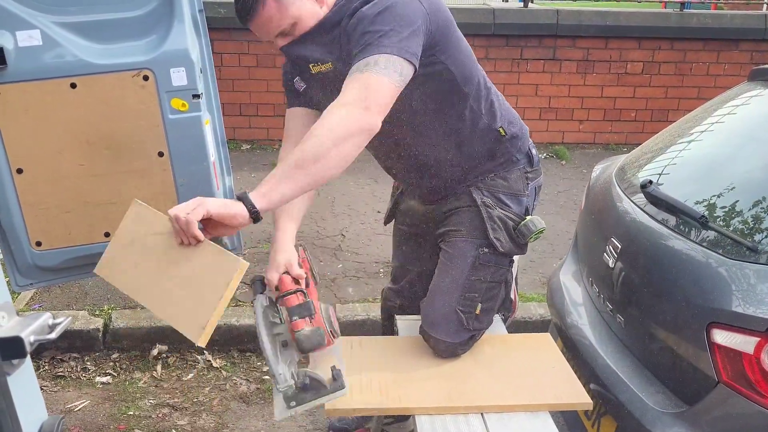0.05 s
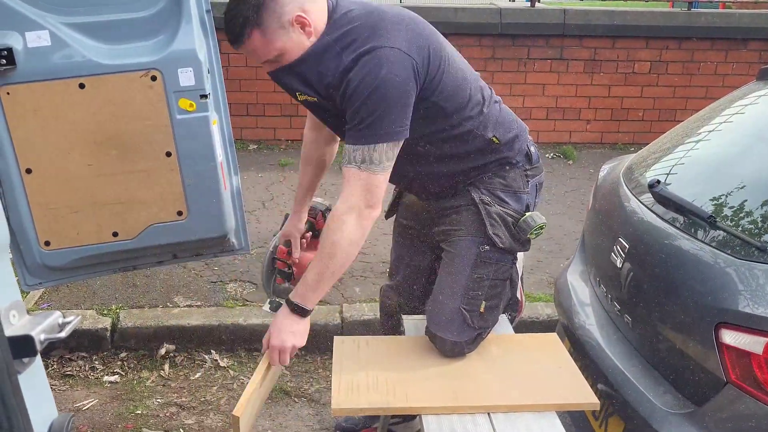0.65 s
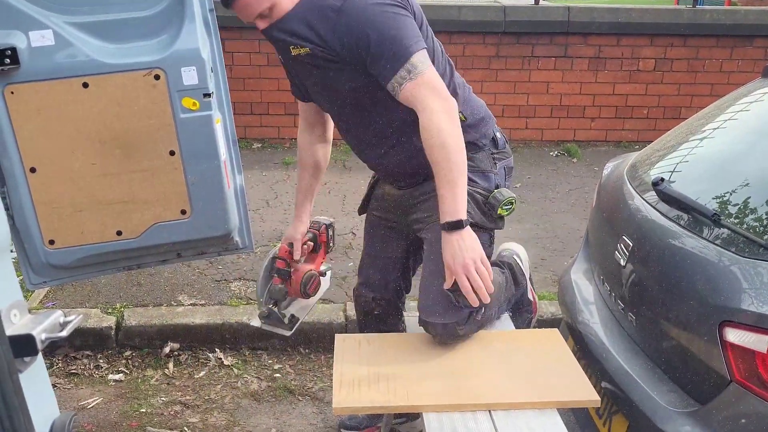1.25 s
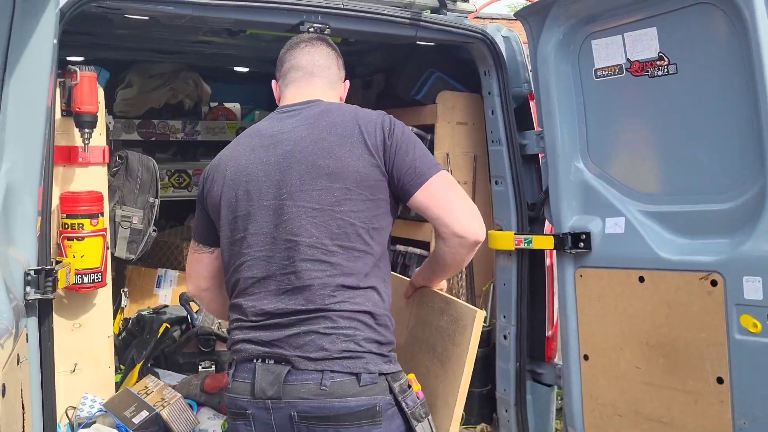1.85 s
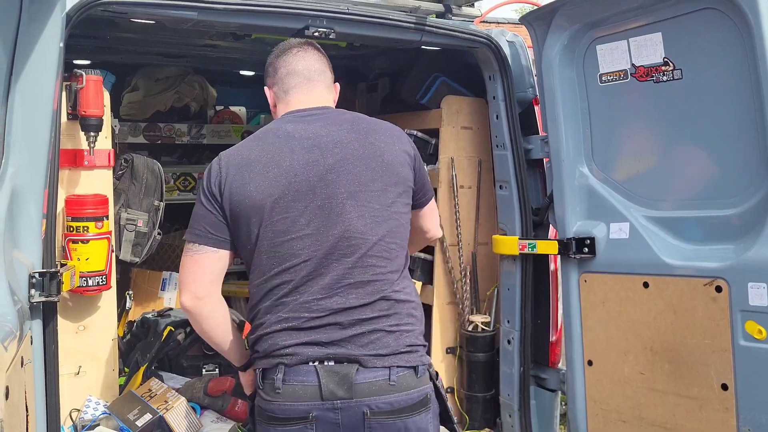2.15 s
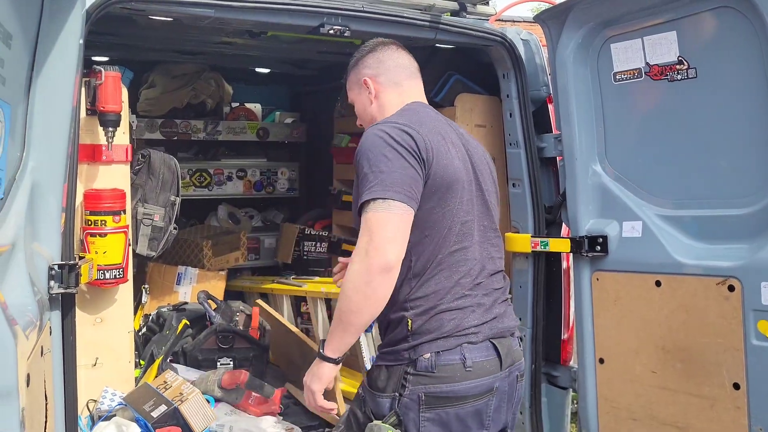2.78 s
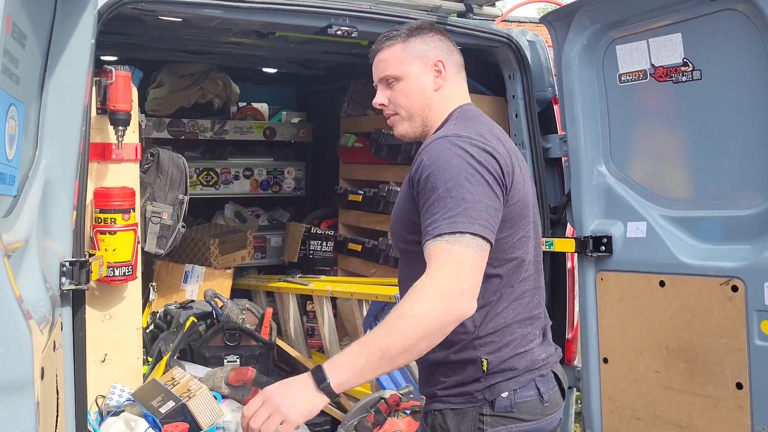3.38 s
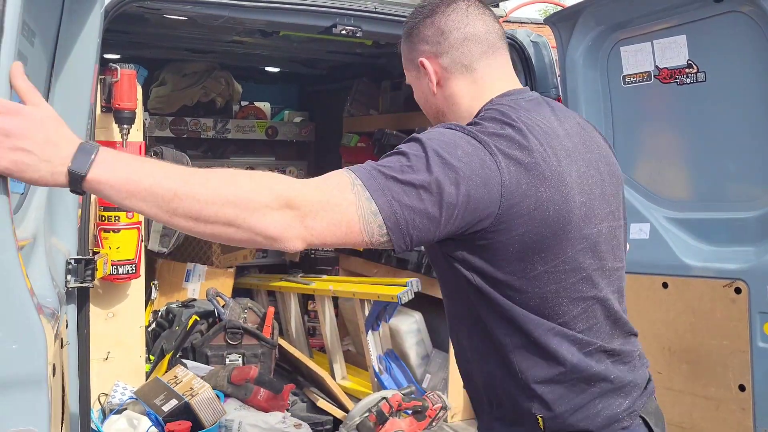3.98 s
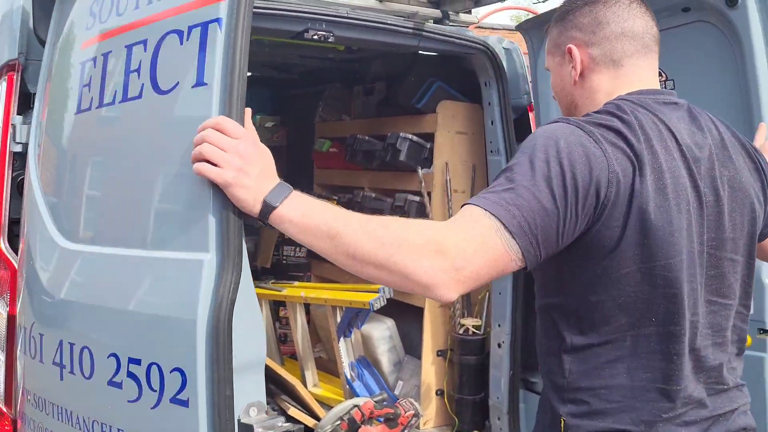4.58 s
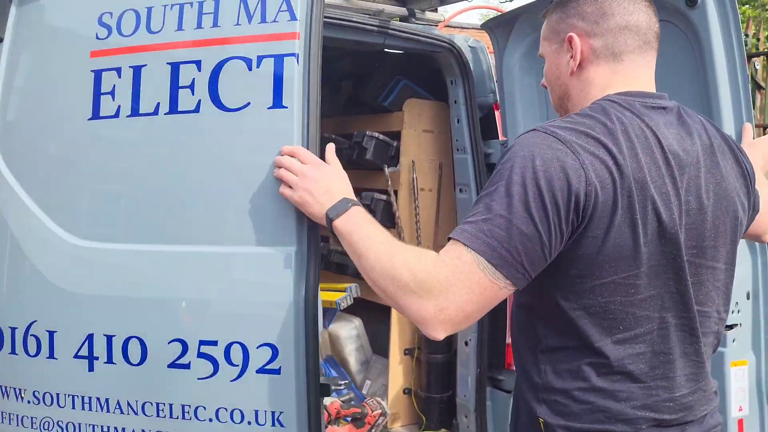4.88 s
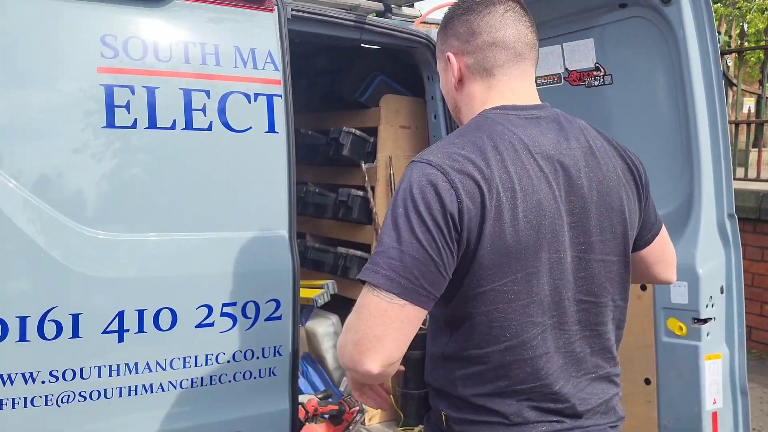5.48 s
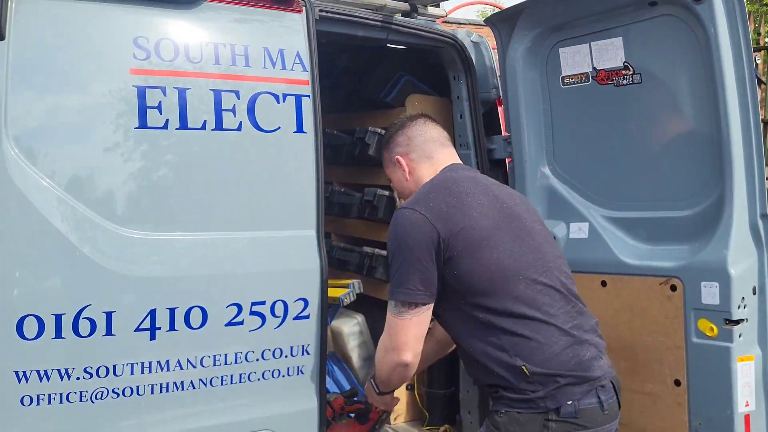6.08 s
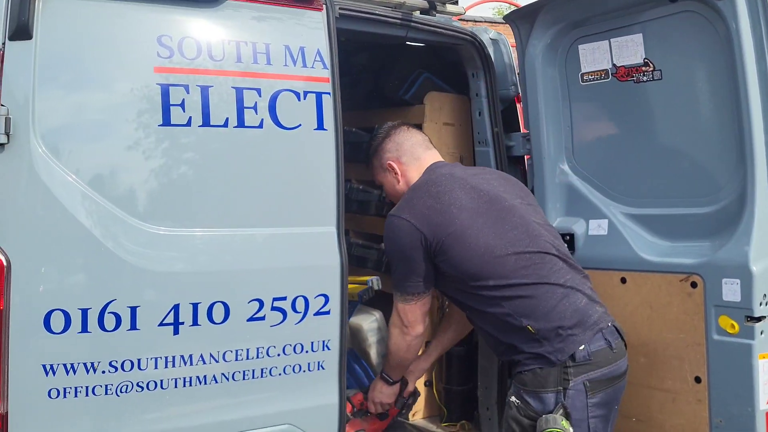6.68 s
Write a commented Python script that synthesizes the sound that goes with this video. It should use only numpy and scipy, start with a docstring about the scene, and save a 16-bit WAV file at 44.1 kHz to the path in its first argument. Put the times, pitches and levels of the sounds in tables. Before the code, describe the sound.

A quiet street, with faint distant traffic and a light breeze on the microphone. At the very start a saw's base clacks lightly, followed by soft clothing rustle and a barely audible thin whine. At about 1.1 seconds a wooden offcut hits the kerb with a sharp, loud clatter, toppling flat at 1.3. At 1.8 boards and tools clatter loudly into a van, with lighter knocks around 2.1. A second clatter runs from 2.6 to 2.8, with wood clacking against shelving and a tiny squeak, then the floor rumbles briefly. A soft knock comes at 4 seconds, and a door stay clacks twice at 4.4. Light knocks and hinge ticks lead to the rear door slamming at 5.4, a heavy shudder with a deep thump of air. Gear shifts faintly near 6.6. A far-off bird chirps faintly around 1.5, 2.3, 4.2 and 6 seconds.

```python
"""In a quiet street, with a breeze on the microphone and traffic far off, a tradesman lifts a saw; his clothes
rustle. He drops a board offcut, which bounces on the kerb and topples flat; a small bird calls far off. He
stows boards and saw among the gear in his van: things knock, heavy ones land on a corner and clatter, and the
floor rumbles. Last he frees a rear door from its stay, swings it round and slams it, pushing air out of the
load bay. Each impact excites the normal modes of the struck body, which then decay freely."""
import sys
import numpy as np
from scipy import signal
from scipy.io import wavfile
from scipy.ndimage import uniform_filter1d, minimum_filter1d

SR = 44100
rng = np.random.default_rng(int(sys.argv[2]) if len(sys.argv) > 2 else 0)


def write(x):
    x = np.atleast_2d(x).T
    wavfile.write(sys.argv[1], SR, np.round(np.clip(x, -1, 1) * 32767).astype(np.int16))


N = 297586
TIME = np.arange(N) / SR
EDGES = 22 * 2 ** (np.arange(20) / 2)   # half-octave bands [Hz]
CENTRES = np.sqrt(EDGES[1:] * EDGES[:-1])

# Single impacts: (time [s], level [dB], extra bass [dB], extra treble [dB], decay time factor [1])
SAW_HITS = [(.043, -24, -24, -5, .65), (.064, -35, -30, 4, .9), (.136, -29.5, -30, -31, 1.2),
            (1.37, -29, 4, -7, 1.1)]
BOARD_HITS = [(1.038, -19, 22, -5.5, .7), (1.052, -14.5, 11.5, -14.5, .4), (1.0671, -9, -3.5, -1.5, .6),
              (1.084, -6.5, -2, 4.5, .9), (1.095, -16, -2.5, 7.5, 1.1), (1.176, -27, -5.5, -3, .7),
              (1.245, -43, -2, 14, .8)]
GEAR_HITS = [(1.694, -35, -30, 10, .6), (2.033, -42, 12, 17, .9), (2.117, -23, -4, -10, .8),
             (2.195, -30, 5.5, -18, 1.2), (2.56, -17, -16, 3.5, 2.2), (2.762, -19, 4, 1, 1),
             (3.098, -40, 6, 4, 1.2), (6.092, -53, 8, 14, .6)]
DOOR_HITS = [(4.025, -32.5, 2, 1, .8), (4.318, -46, -2, -4, 1), (4.592, -35, -9, 4, .6),
             (5.085, -28.5, -10, 10, .65), (5.348, -13, 0, -4, .9)]   # hand, stay and seal
# Impacts of the stowed board on the shelving: (time [s], level [dB])
SHELF_HITS = [(1.786, -19), (1.819, -12), (2.117, -35), (2.588, -14.5), (2.61, -12), (2.65, -17),
              (2.789, -16.5)]
# Runs of impacts: (time [s], level [dB], interval [s], loss by the last impact [dB],
# extra bass [dB], extra treble [dB], decay time factor [1])
OFFCUT_TOPPLE = (1.304, -15.5, .006, 0, .5, 0, .8)
GEAR_CLATTERS = [(1.782, -5, .036, 38, 0, 1.5, .7), (2.587, -12, .025, 8, 2, 3, .9),
                 (2.786, -18.5, .056, 23, 3, 2.5, 1.3), (2.993, -45.5, .03, 0, 0, 11, 1.8),
                 (6.589, -42.5, .042, 50, 8, 2, .9)]
STAY_RELEASE = (4.377, -12.5, .026, 6, -14, 5, .53)
HINGE_TICKS = (5.157, -32.5, .042, 2, -10, 6.5, .65)
SLAM = (5.361, -7.3, .021, 29, 1.5, 2.5, .85)
# Distinct normal modes: (frequency [Hz], relative level [dB], base T60 [s])
SAW_MODES = [(445.4, -15.5, 0.14), (889, -8, 0.09), (1064, -30, 0.16), (1094, -7, .09), (1517, -6, 0.071),
             (1773, -14.5, 0.11), (2240, -10.5, .075), (2343, -12.5, 0.0993), (2930, -21, .08),
             (4830, -33, 0.083)]
BOARD_MODES = [(328, -20.5, 0.6), (455, -28, .25), (684, -20, .2), (832, -10.5, .12), (984, -13.5, .15),
               (1112, -11, .17), (1232, -12, .17), (1375, -14, .14), (1580, -15, .13), (1885, -14, .1),
               (2216, -13, .09), (2865, -21, .12), (3980, -31, .1)]
GEAR_MODES = [(136, -6.5, .2), (164.5, -15, 0.25), (403.4, -4.5, 0.15), (435, -21, .16), (719, -21, 0.12),
              (809, -4, 0.085), (884.5, -6.5, 0.081), (1001, -11.5, 0.13), (1113, -12, 0.12),
              (1376, -25, 0.076), (1709, -26, 0.12), (1967, -12, 0.051), (2330, -30.5, 0.22),
              (3830, -25, .08)]
SHELF_MODES = [(520, -14.5, 0.042), (679, -10, 0.11), (768, -5, 0.11), (826, 0.5, 0.07), (900, -9.5, 0.15),
               (1015, -12, 0.052), (1130, -18, 0.13)]
DOOR_MODES = [(36, -12.5, 0.12), (56, -13, 0.73), (82, -3.5, 0.28), (115.7, -27.5, 1), (171.9, -6.5, 0.31),
              (251, -4.5, .25), (320.7, -8, 0.32), (366.7, -4.5, 0.25), (433, -12, 0.11), (704.5, -20, .25),
              (847, -27, 0.28), (1016, -22, 0.28), (1140, -31, 0.26), (1875, -20, .12), (2290, -23, .18),
              (2680, -34, 0.22), (3700, -34.5, 0.074), (3660, -39, 0.15), (5030, -37, 0.33)]
# Dense, overlapping modes: (frequency [Hz], relative spectral density [dB], base T60 [s])
SAW_DENSE = [(38.8, -27, .08), (200, -13.5, 0.16), (450, -3, 0.05), (900, -3, 0.11), (1600, -1.5, 0.074),
             (2367, -10.5, 0.092), (3414, -19.5, .08), (7350, -26, 0.027), (9500, -49, 0.11),
             (15000, -52, .08)]
BOARD_DENSE = [(40, -26.5, .1), (150, -10, .1), (400, -5, 0.32), (900, 2.5, .11), (1500, -4.5, .1),
               (2540, -4.5, .09), (4000, -18.5, .1), (7500, -28, .1), (9500, -40.5, .1), (15000, -47, .1)]
GEAR_DENSE = [(29.68, -16, .25), (70, -8, 0.63), (140, -2.5, 0.31), (400, 4.5, 0.15), (830, -7.5, 0.095),
              (1390, -11, 0.22), (2420, -14, 0.11), (4060, -22.5, 0.2), (7720, -31, 0.17),
              (9490, -42, 0.19), (15300, -41, 0.13)]
DOOR_DENSE = [(30, -10.5, 0.1), (70, -8, 0.36), (170, 0.5, 0.29), (370, -5, 0.39), (550, -17, 0.27),
              (880, -10.5, 0.22), (1500, -19.5, .2), (2500, -24.5, 0.3), (4000, -29.5, .19),
              (7500, -35, 0.16), (9600, -45.5, .18), (15000, -43, .16)]
# Noise spectra: (frequency [Hz], relative spectral density [dB])
RUMBLE_SPECTRUM = [(25, -11), (55, 6.5), (110, -1.5), (250, -12), (500, -20.5), (1200, -36), (4000, -56)]
TRAFFIC_SPECTRUM = [(30, 7.5), (300, 9), (700, 1.5), (1500, -2), (3000, -6), (7200, -6.5), (9000, -20.5),
                    (15000, -20.5)]
RUB_SPECTRUM = [(100, -5), (1000, 3), (3000, 0.5), (7000, -1), (9500, -22.5), (15000, -10.5)]
PUSH_SPECTRUM = [(25, -4.5), (40, -0.5), (65, 0), (100, -14.5), (250, -31.5), (1000, -59.5), (4000, -84)]
# Swells of noise: (time [s], level [dB], Gaussian half-width [s])
RUMBLES = [(.55, -54, .07), (1.7, -54, .5), (2.9, -36, .1), (3.92, -51, .12), (4.6, -41.5, .1),
           (5.18, -33, .06), (5.79, -41, .07), (6.73, -35, .015)]   # breeze on the microphone, and the van floor after the clatter
RUBS = [(.48, -68, .07), (.752, -58, .022), (1.85, -53, .22), (2.374, -60, .04), (3.07, -58, .07),
        (4.75, -59.5, .45), (6.6, -62, .25)]
AIR_PUSH = (5.41, -15, .033)
# Swelling tones: (time [s], frequency [Hz], level [dB], Gaussian half-width [s])
WHINES = [(.35, 1113, -74, .34), (.55, 2620, -75, .35)]
HIGH_TONES = [(1.53, 5600, -61, 0.014), (2.28, 4500, -63, .01), (4.207, 4690, -58, 0.0095),
              (4.762, 4150, -66, 0.013), (6.04, 4650, -66, 0.013)]   # a distant bird's chirps and, at 4.762 s, one faint squeak
SQUEAKS = [(1.612, 389, -39, 0.015), (1.765, 405, -36, 0.0095), (2.578, 432.6, -22.5, 0.00847),
           (3.112, 409, -36, 0.007)]
# Reverberation before its onset ramp: (frequency [Hz], level re direct sound [dB], T60 [s])
STREET = [(60, -29, .5), (400, -4.5, 0.21), (1500, -23, .45), (4000, -7, .45), (14000, -21, .35)]
LOAD_BAY = [(50, -14, 0.3), (169, -11, 0.54), (500, -14.5, 0.54), (1501, -20.5, .45), (5000, -19.5, 1),
            (14000, -12, .4)]
# Coherence of the two channels: (frequency [Hz], correlation [1], left minus right [dB])
COHERENCE = [(60, 0.95, 1.0), (300, 0.96, 0.96), (1000, 0.36, 1.6), (2300, 0.15, 0.5), (5070, 0.015, -1),
             (14000, 0.032, -2)]

GEAR_SETTLING, DOOR_SETTLING = 1.4, 1.5   # a run's loss grows as this power of its progress
DULLING_DB = .6   # treble lost with each further impact of a run
GAP_SPREAD, TOUCH_SPREAD_DB, MODE_SPREAD_DB = .04, 1.0, 2.5   # random scatter from impact to impact
CUTOFF_HZ = 16000


def from_db(db):
    """Amplitude ratio of a level."""
    return 10 ** (np.asarray(db) / 20)


def at_hz(table, hz, column=1):
    """Interpolation of one column along log frequency."""
    table = np.array(table)
    return np.interp(np.log(hz), np.log(table[:, 0]), table[:, column])


def fade(t, t60):
    """Free exponential decay, 60 dB down after t60."""
    return np.exp(np.maximum(t * (-float(np.log(1000)) / t60), -20))


def swing_up(hz, t):
    """Onset transient: a vibration builds up in about half a cycle."""
    return 1 - np.exp(-np.minimum(4 * hz * t, 4) ** 2)


def swell(s, db, half_width):
    """Gaussian envelope centred on time s."""
    return from_db(db) * np.exp(-.5 * np.minimum(((TIME - s) / half_width) ** 2, 100))


def wander(size):
    """Random fluctuation of unit variance, correlated over size samples."""
    slow = uniform_filter1d(rng.standard_normal(N), size=size)
    return slow / slow.std()


def band_gains(spectrum):
    """Band power is density times bandwidth; the rms gains are scaled to unit total power."""
    gains = from_db(at_hz(spectrum, CENTRES)) * np.sqrt(CENTRES)
    return gains / np.linalg.norm(gains)


def noise_bands():
    """Partially coherent noise (band, channel, time): alike in the bass, unrelated in the treble."""
    white, bands = rng.standard_normal((2, 2, N)), []
    for k, hz in enumerate(CENTRES):
        bandpass = signal.butter(3, EDGES[k:k + 2], "band", fs=SR, output="sos")
        pair = signal.sosfilt(bandpass, white[k % 2])
        mid, side = pair / pair.std()
        correlation = at_hz(COHERENCE, hz)
        common = np.sqrt((1 + correlation) / 2) * mid
        opposed = np.sqrt((1 - correlation) / 2) * side * [[1], [-1]]
        balance = from_db(at_hz(COHERENCE, hz, column=2) * np.array([[.5], [-.5]]))
        bands.append(balance * (common + opposed))
    return np.array(bands, dtype=np.float32)


def coloured(bands, spectrum):
    """Stationary noise as a weighted sum of bands."""
    noise = np.tensordot(band_gains(spectrum).astype(np.float32), bands, 1)
    return np.roll(noise, rng.integers(N), axis=1)


def dying_noise(bands, gains, t60s, size):
    """Overlapping modes act as noise, each band decaying at its own rate."""
    start, t = rng.integers(N - size), TIME[:size].astype(np.float32)
    decay = fade(t, np.float32(t60s[:, None])) * swing_up(np.float32(CENTRES[:, None]), t)
    tails = bands[:, :, start:start + size] * decay[:, None]
    energy_norm = np.sqrt(2 * np.sum(decay ** 2, axis=1) / np.einsum("bct,bct->b", tails, tails))
    return np.tensordot((gains * energy_norm).astype(np.float32), tails, 1)


def modal_ring(hz, strengths, t60s, size):
    """Superposed damped sinusoids; the phase difference between channels grows with frequency."""
    hz, strengths, t60s = np.float32([hz, strengths, t60s])[:, :, None]
    t = TIME[:size].astype(np.float32)
    envelope = strengths * fade(t, t60s) * swing_up(hz, t)
    phase = 2 * np.pi * hz * t
    skew = np.minimum(hz / 4500, 1) * np.resize(np.float32([1, -1]), hz.shape)
    return np.array([np.sum(envelope * np.sin(phase + side * skew), axis=0) for side in (1, -1)])


def contact_gain(hz, bass_db, treble_db):
    """Excitation spectrum: heavy contacts drive the low modes more, hard ones the high modes."""
    return from_db(bass_db / (1 + (hz / 380) ** 2) + treble_db / (1 + (1900 / hz) ** 2))


def struck(bands, hits, modes, dense, modes_db, dense_db, spot_db, crack_db, attack_s, crack_t60=.02):
    """Impulse response: each impact gives a short crack and excites dense and distinct modes."""
    long, short = SR // 2, SR // 10
    out = np.zeros((2, N + long))
    hz, mode_db, t60 = np.transpose(modes)
    upper = (CENTRES > 500) & (CENTRES < 7500)
    for s, level_db, bass_db, treble_db, ring in hits:
        size = long if level_db > -23 else 2 * short
        gains = band_gains(dense) * contact_gain(CENTRES, bass_db, treble_db)
        dense_t60s = ring * at_hz(dense, CENTRES, column=2)
        blow = from_db(dense_db) * dying_noise(bands, gains, dense_t60s, size)
        crack_gains = gains * CENTRES / (CENTRES + 900)
        crack = dying_noise(bands, crack_gains, np.full(len(CENTRES), crack_t60), short)
        blow[:, :short] += from_db(crack_db) * crack
        scatter_db = MODE_SPREAD_DB * rng.standard_normal(len(hz))
        strengths = from_db(mode_db + modes_db + scatter_db) * contact_gain(hz, bass_db, treble_db)
        blow += modal_ring(hz, strengths, ring * t60, size)
        # each struck spot favours upper modes of its own, one per half octave
        spot_hz = CENTRES[upper] * 2 ** (.5 * (rng.random(upper.sum()) - .5))
        spot_t60s = ring * at_hz(dense, spot_hz, column=2)
        blow[:, :2 * short] += modal_ring(spot_hz, from_db(spot_db) * gains[upper], spot_t60s, 2 * short)
        blow *= 1 - np.exp(-TIME[:size] / attack_s)   # vibration takes time to spread through the body
        at = round(s * SR)
        out[:, at:at + size] += from_db(level_db) * blow
    return out[:, :N]


def clatter(run, settling, count):
    """Damped rocking: nearly periodic impacts hold their strength at first, then give out."""
    s, level_db, gap_s, loss_db, bass_db, treble_db, ring = run
    k, chance = np.arange(count), rng.standard_normal((count, 2))
    times = np.minimum(s + gap_s * (k + GAP_SPREAD * np.sqrt(k) * chance[:, 0]), TIME[-1])
    levels = level_db - loss_db * (k / (count - 1)) ** settling + TOUCH_SPREAD_DB * chance[:, 1]
    trebles = treble_db - DULLING_DB * k
    return [(at, db, bass_db, treble, ring) for at, db, treble in zip(times, levels, trebles)]


def tones(rows, glide_per_s, waver, flutter_db):
    """Frequency and amplitude modulation: tones glide, waver and flutter as they swell."""
    out, sway = np.zeros(N), waver * wander(size=200)
    for s, hz, db, half_width in rows:
        near = np.abs(TIME - s) < 5 * half_width
        pitch = hz * (1 + glide_per_s * (TIME[near] - s) + sway[near])
        phase = 2 * np.pi * np.cumsum(pitch) / SR
        out[near] += swell(s, db, half_width)[near] * np.sqrt(2) * np.sin(phase)
    return out * from_db(flutter_db * wander(size=2500))


def low_rumble(bands, level_db=-58, wander_db=2):
    """Modulated low noise: breeze on the microphone, and the van floor rumbling after the clatter."""
    breeze = from_db(level_db + wander_db * wander(size=9000))
    return (breeze + sum(swell(*row) for row in RUMBLES)) * coloured(bands, RUMBLE_SPECTRUM)


def far_traffic(bands, level_db=-64):
    """Distant incoherent sources sum to a steady hiss."""
    return from_db(level_db) * coloured(bands, TRAFFIC_SPECTRUM)


def saw_and_topple(bands):
    """Modal ringing: the saw's base clacks at the start; later the offcut topples with a quick chatter."""
    hits = SAW_HITS + clatter(OFFCUT_TOPPLE, GEAR_SETTLING, count=3)
    return struck(bands, hits, SAW_MODES, SAW_DENSE,
                  modes_db=2, dense_db=0, spot_db=-4, crack_db=-13, attack_s=.0013)


def faint_whine():
    """Slow amplitude modulation: two thin tones come and go."""
    return tones(WHINES, glide_per_s=-.004, waver=.012, flutter_db=3)


def rustle(bands, grain_db=2.5):
    """Sliding friction of cloth and boards makes grainy noise."""
    envelope = sum(swell(*rub) for rub in RUBS) * from_db(grain_db * wander(size=150))
    return envelope * coloured(bands, RUB_SPECTRUM)


def dropped_board(bands):
    """Free vibration: the offcut rings after each bounce on the kerb."""
    return struck(bands, BOARD_HITS, BOARD_MODES, BOARD_DENSE,
                  modes_db=3, dense_db=-.5, spot_db=-4, crack_db=-1, attack_s=.0012)


def loose_ticks(start_s, end_s, level_db, treble_db, count):
    """Random light impacts of loose things in the load and in pockets, one per equal interval."""
    chance = rng.random((count, 2))
    times = start_s + (end_s - start_s) * (np.arange(count) + chance[:, 0]) / count
    return [(s, level_db - 8 * softness, 0, treble_db, .8) for s, softness in zip(times, chance[:, 1])]


def van_gear(bands):
    """Impact excitation of the load: single knocks, one of them the first corner touch of a heavy thing that
    then rocks to rest; loose bits tick."""
    rocking = [touch for run in GEAR_CLATTERS for touch in clatter(run, GEAR_SETTLING, count=5)]
    ticks = loose_ticks(1.3, 6.55, level_db=-56, treble_db=10, count=12)
    return struck(bands, GEAR_HITS + rocking + ticks, GEAR_MODES, GEAR_DENSE,
                  modes_db=1.5, dense_db=-1, spot_db=-3.5, crack_db=-4, attack_s=.0016)


def bird_and_squeak():
    """Frequency modulation of brief high tones: a distant bird's chirps and one faint squeak."""
    return tones(HIGH_TONES, glide_per_s=-.6, waver=.015, flutter_db=2.5)


def board_squeaks():
    """Stick-slip friction: a dragged board edge judders briefly."""
    return tones(SQUEAKS, glide_per_s=.3, waver=.02, flutter_db=1)


def board_on_shelf(bands, ring=.9):
    """Strongly damped modes: the stowed board clacks against the shelving."""
    hits = [(s, level_db, 0, 0, ring) for s, level_db in SHELF_HITS]
    return struck(bands, hits, SHELF_MODES, GEAR_DENSE,
                  modes_db=4.5, dense_db=-6, spot_db=-14.5, crack_db=-7, attack_s=.001)


def van_door(bands):
    """Panel vibration: the stay clacks twice, the hinge ticks, the slam shudders through the door."""
    stay = clatter(STAY_RELEASE, DOOR_SETTLING, count=2)
    hinge = clatter(HINGE_TICKS, DOOR_SETTLING, count=5)
    slam = clatter(SLAM, DOOR_SETTLING, count=10)
    return struck(bands, DOOR_HITS + stay + hinge + slam, DOOR_MODES, DOOR_DENSE,
                  modes_db=1, dense_db=-1.5, spot_db=-5, crack_db=-3.5, attack_s=.0014)


def air_push(bands):
    """Volume displacement: the slammed door shoves air out of the load bay in a low thump."""
    return swell(*AIR_PUSH) * coloured(bands, PUSH_SPECTRUM)


def placed(x, bands, space, right_lag_ms, build_up_s):
    """Direct sound arrives with a time difference between channels; the diffuse field builds after it."""
    t60s = at_hz(space, CENTRES, column=2)
    gains = from_db(at_hz(space, CENTRES)) * np.sqrt(4 * np.log(1000) * np.diff(EDGES) / t60s) / SR
    response = dying_noise(bands, gains, t60s, SR) * np.minimum(TIME[:SR] / build_up_s, 1)
    diffuse = signal.fftconvolve(x.mean(axis=0)[None], response, axes=1)[:, :N]
    direct = np.array([x[0], np.interp(TIME - right_lag_ms / 1000, TIME, x[1])])
    return direct + diffuse


def scene():
    """Superposition of the sources in the street, those in the load bay and the noise around them."""
    bands = noise_bands()
    board, clacks = dropped_board(bands), saw_and_topple(bands)
    gear, shelf, door = van_gear(bands), board_on_shelf(bands), van_door(bands)
    squeaks, high_tones, whine = board_squeaks(), bird_and_squeak(), faint_whine()
    return (placed(clacks + whine + board + high_tones, bands, STREET, right_lag_ms=.055, build_up_s=.025)
            + placed(gear + squeaks + shelf, bands, LOAD_BAY, right_lag_ms=-.01, build_up_s=.013)
            + placed(door, bands, LOAD_BAY, right_lag_ms=.08, build_up_s=.011)
            + low_rumble(bands) + far_traffic(bands) + rustle(bands) + air_push(bands))


def record(dry):
    """Peak limiting holds the loudest impacts at full scale; a low-pass filter then cuts the top."""
    allowed = 1 / np.maximum(np.abs(dry).max(axis=0), 1)
    gain = uniform_filter1d(minimum_filter1d(allowed, size=161), size=161)
    lowpass = signal.ellip(10, .3, 80, CUTOFF_HZ, fs=SR, output="sos")
    return signal.sosfilt(lowpass, gain * dry)


dry = scene()
out = record(dry)
write(out)
```